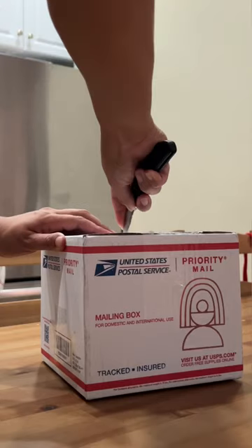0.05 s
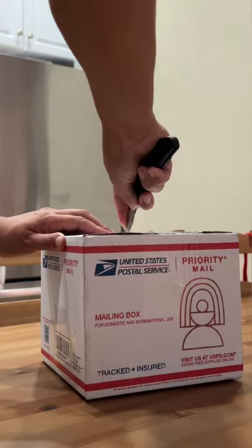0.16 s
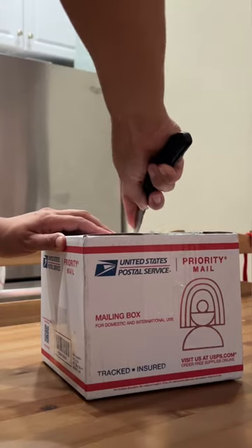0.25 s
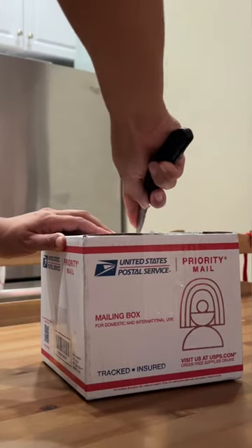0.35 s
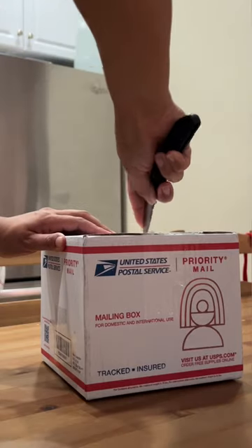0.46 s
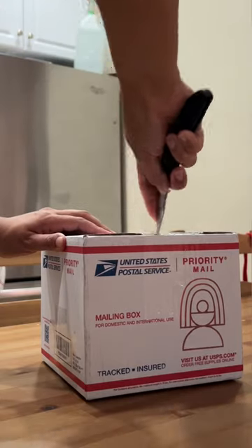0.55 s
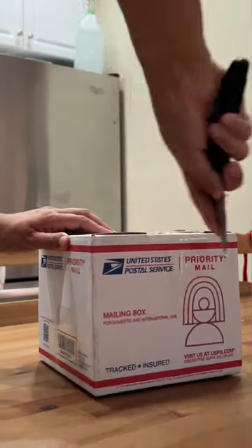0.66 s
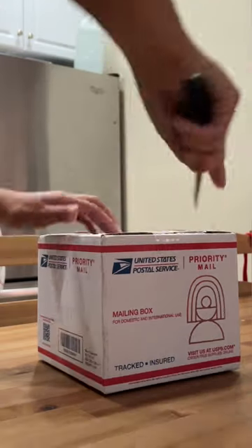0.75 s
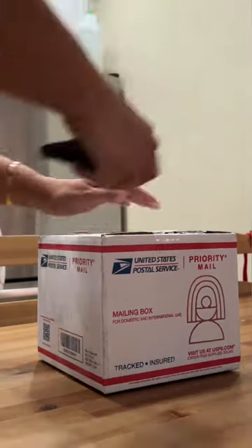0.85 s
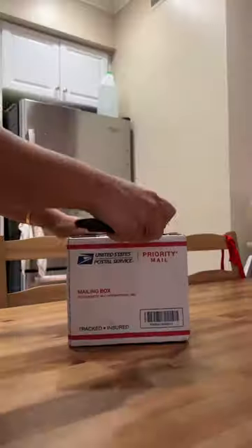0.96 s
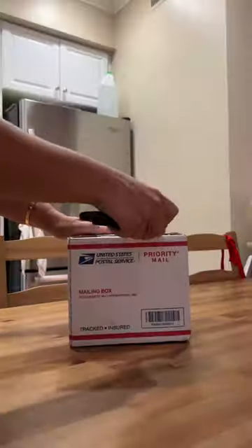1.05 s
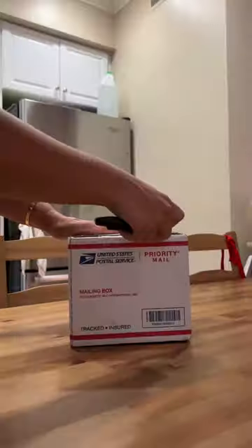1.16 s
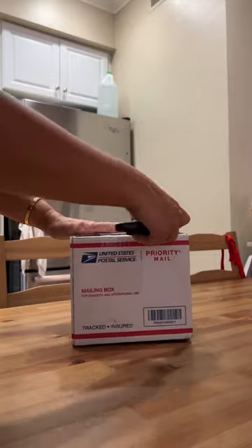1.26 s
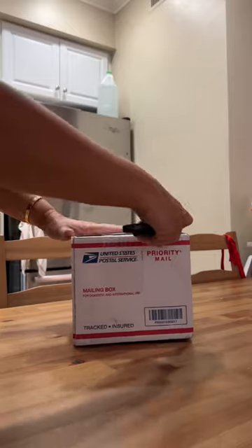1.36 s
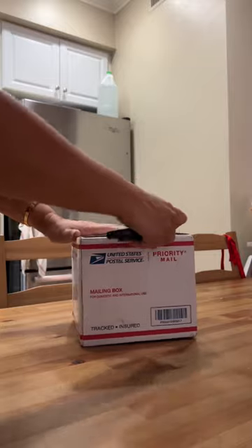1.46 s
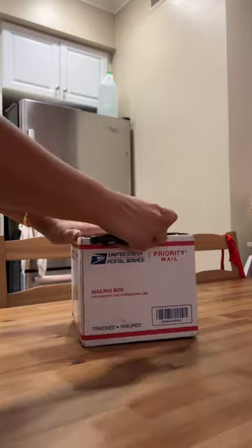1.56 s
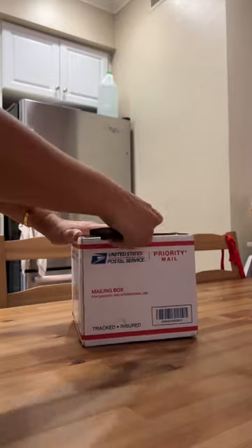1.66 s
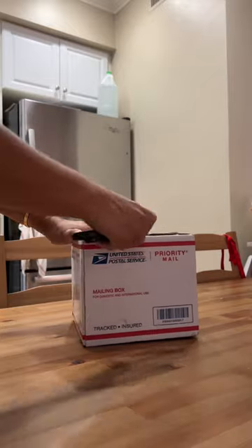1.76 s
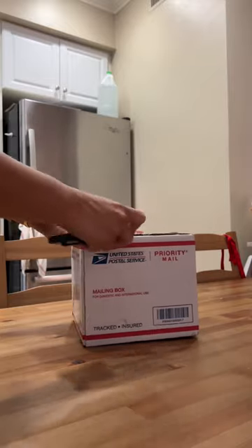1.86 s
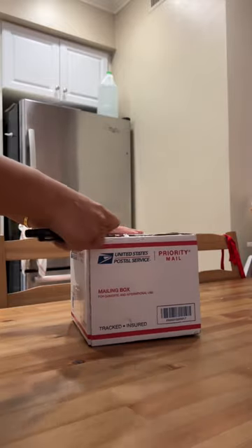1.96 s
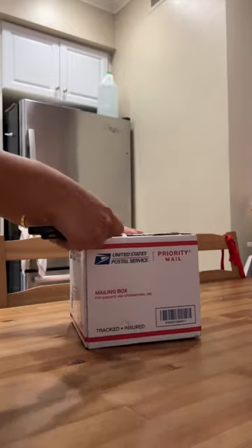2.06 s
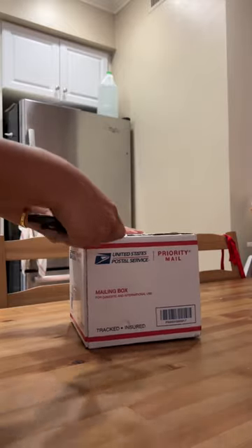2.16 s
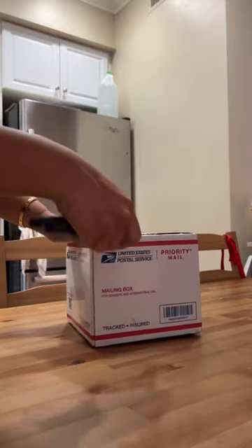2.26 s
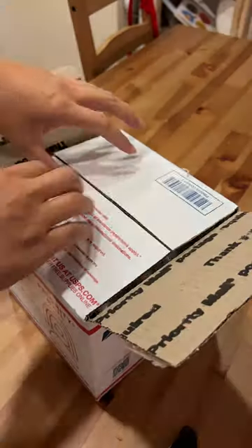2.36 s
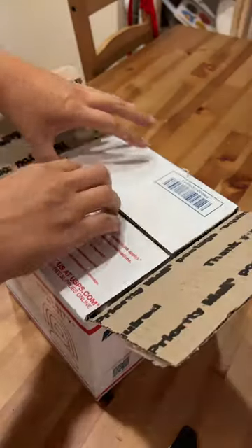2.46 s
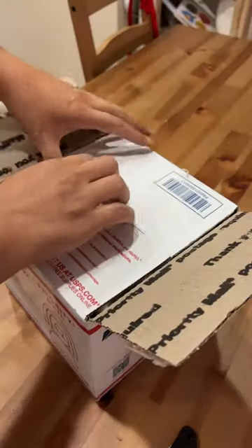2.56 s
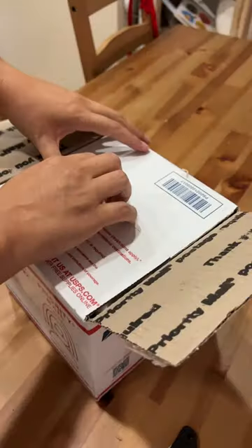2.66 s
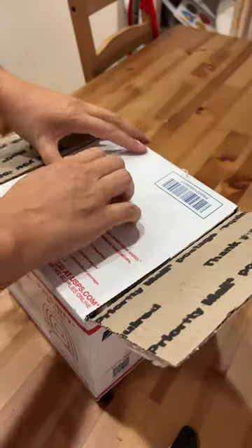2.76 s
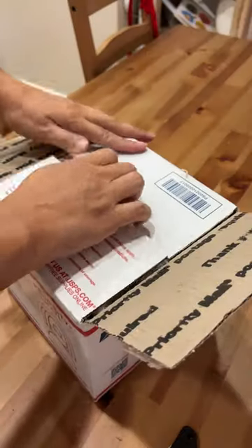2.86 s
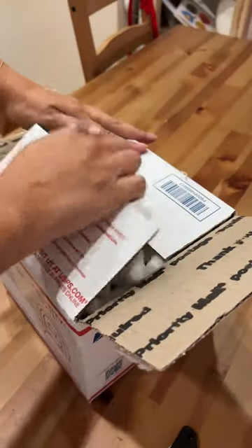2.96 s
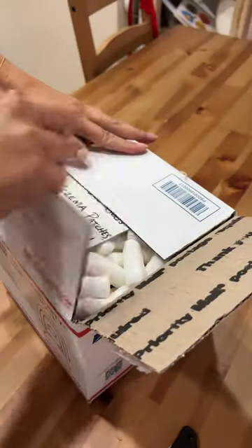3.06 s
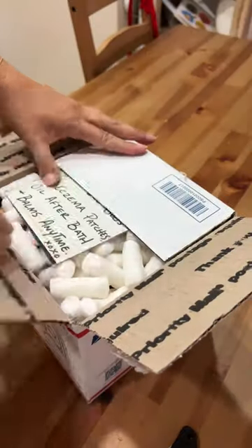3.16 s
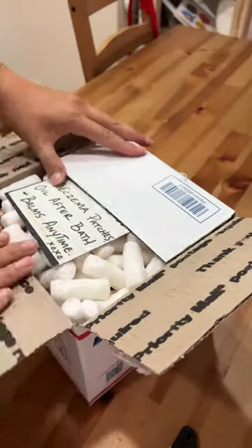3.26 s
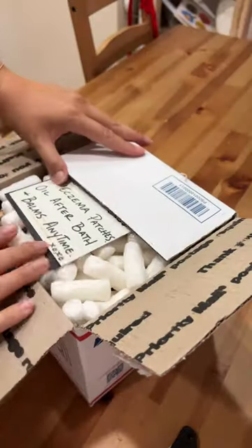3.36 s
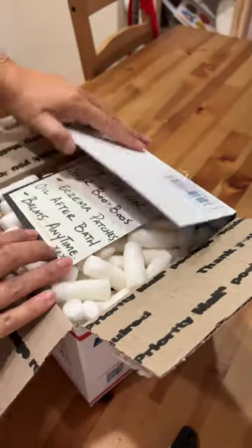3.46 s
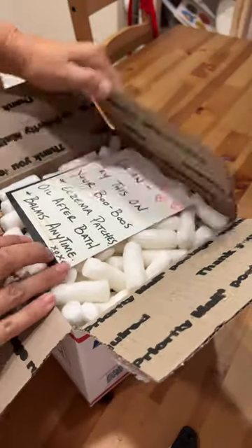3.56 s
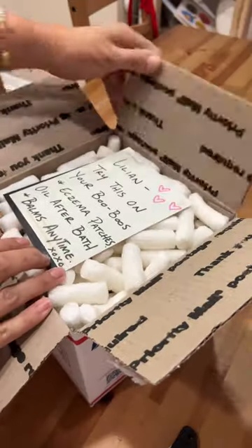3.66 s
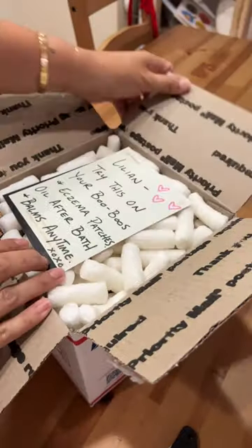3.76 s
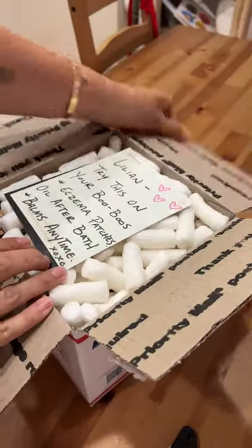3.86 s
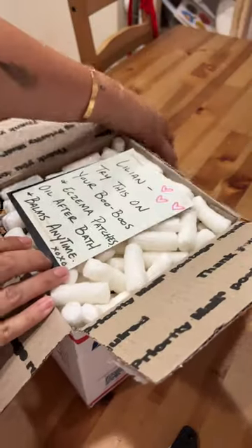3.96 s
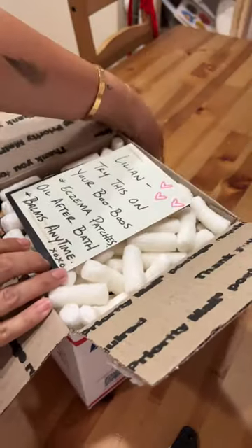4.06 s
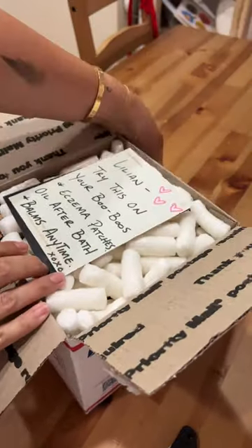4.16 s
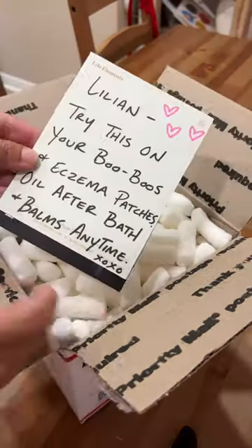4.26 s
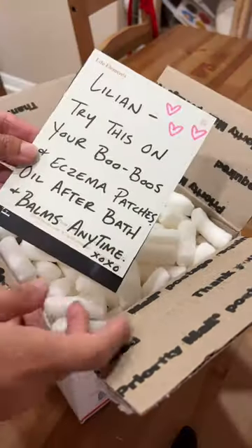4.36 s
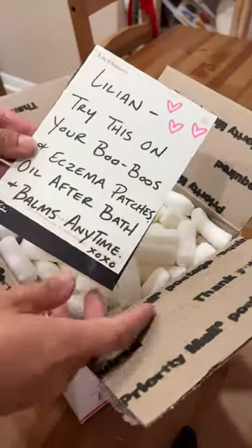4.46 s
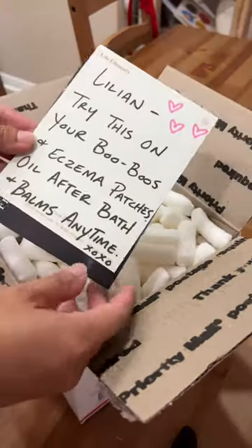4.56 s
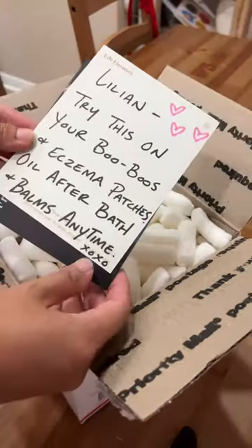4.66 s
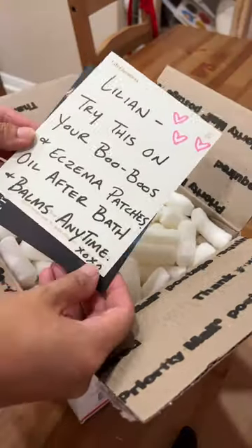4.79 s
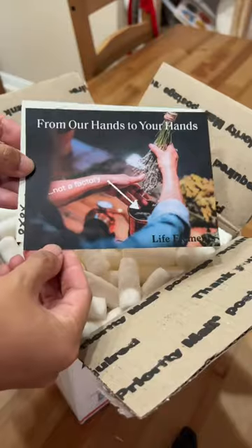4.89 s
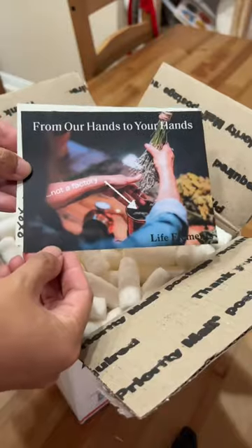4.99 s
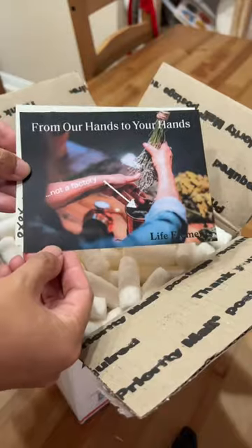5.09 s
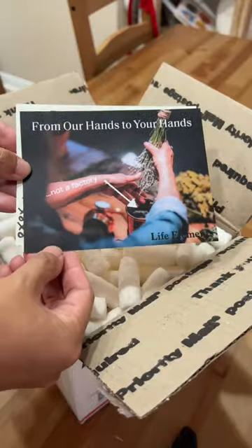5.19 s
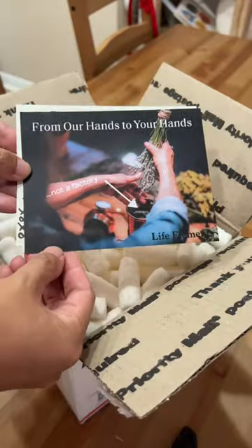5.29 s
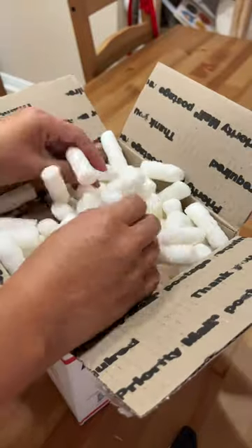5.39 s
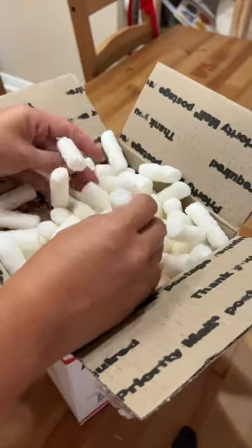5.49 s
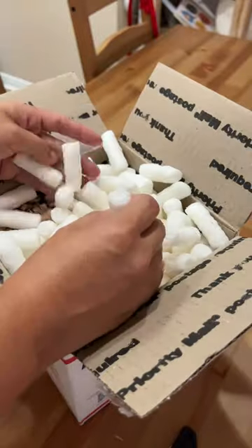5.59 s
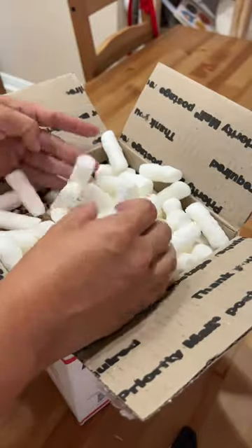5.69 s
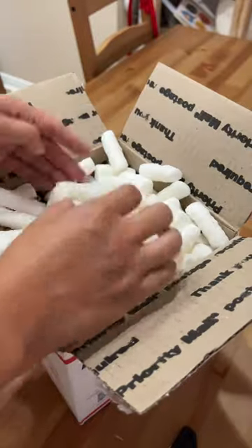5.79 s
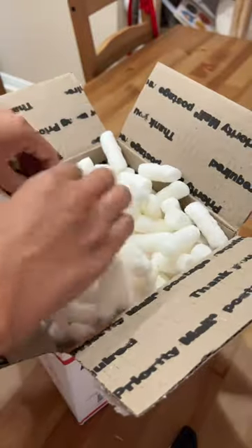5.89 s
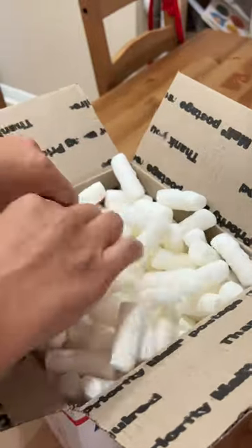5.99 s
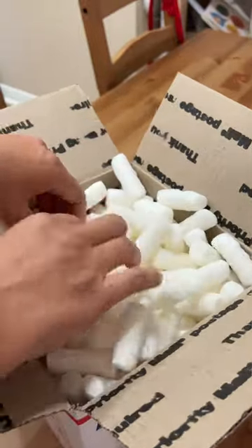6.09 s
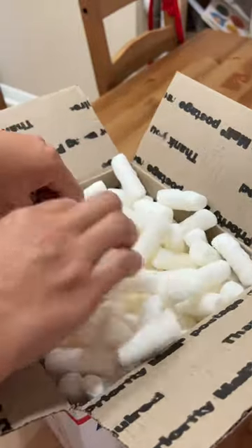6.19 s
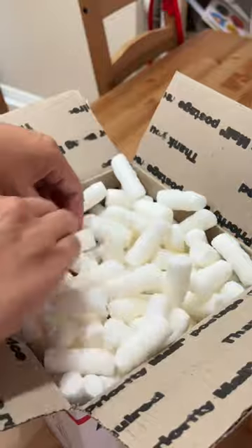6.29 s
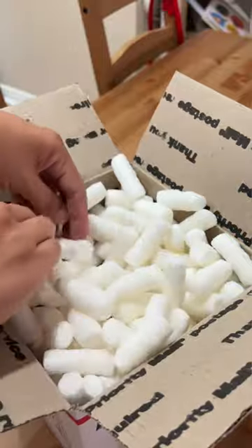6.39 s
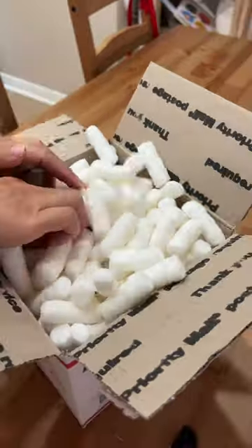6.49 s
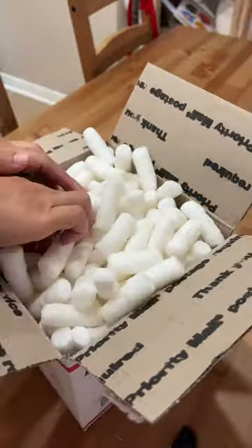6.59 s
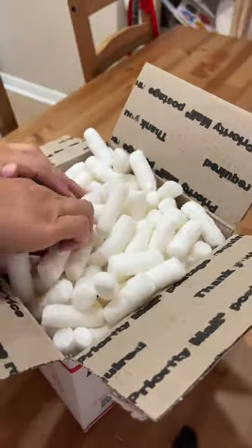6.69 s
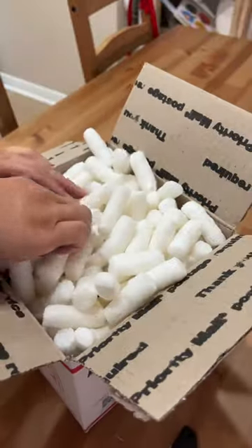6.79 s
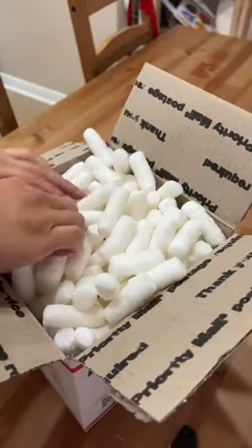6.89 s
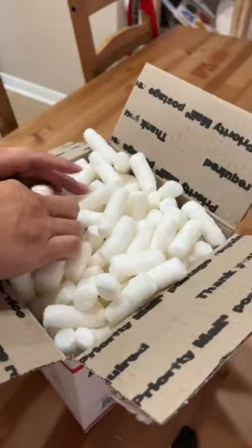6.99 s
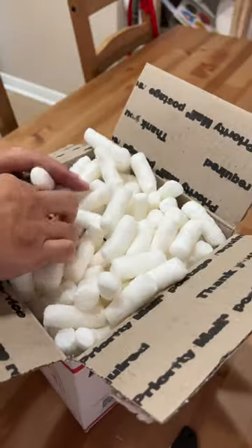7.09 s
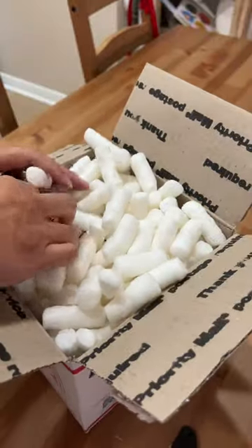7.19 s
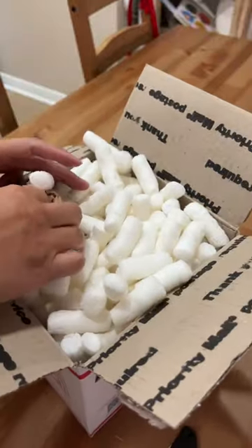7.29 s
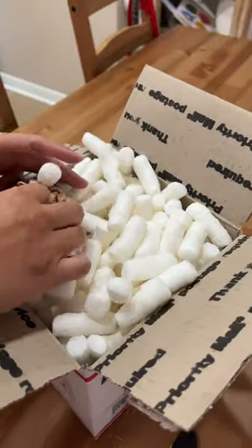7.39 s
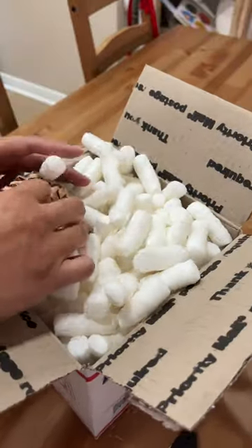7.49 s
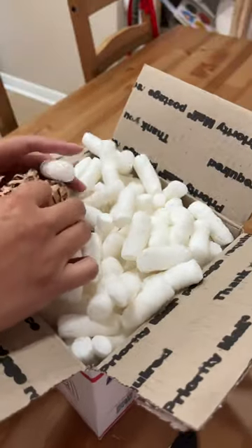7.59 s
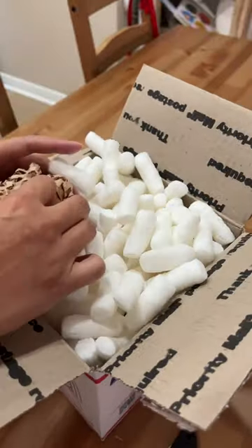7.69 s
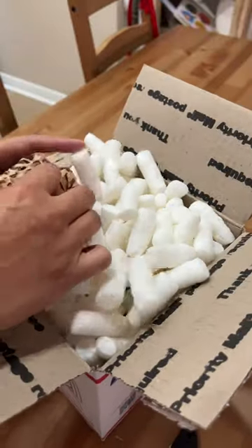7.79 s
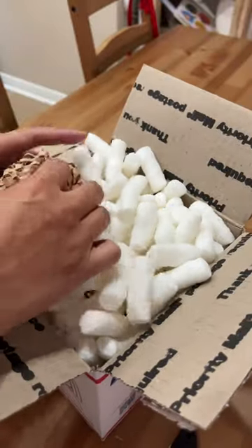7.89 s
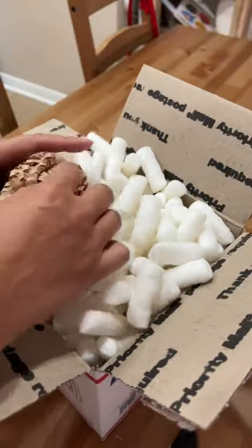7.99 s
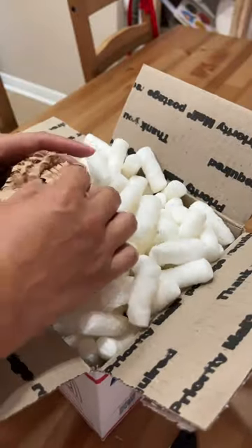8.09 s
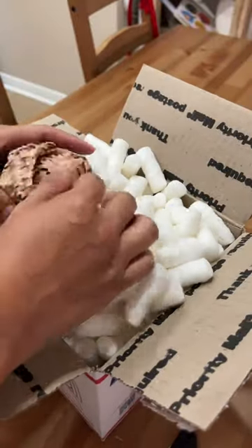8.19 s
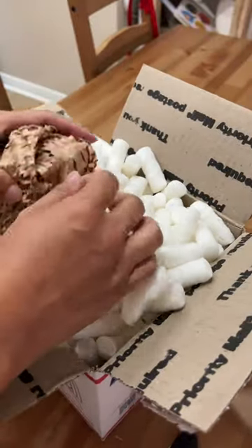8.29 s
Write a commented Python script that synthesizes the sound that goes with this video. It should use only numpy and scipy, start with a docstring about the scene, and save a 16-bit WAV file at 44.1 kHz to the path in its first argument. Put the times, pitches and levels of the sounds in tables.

```python
"""A cardboard box is slit by a knife, its flaps are pulled open and a card is slid out; hands then dig in foam peanuts.
Rubbing is stick-slip: clumps of tiny clicks, split into boom, rasp and fizz, and shaped by each movement.
Knocks, taps, tape and foam squeaks are decaying modes; crackles and catches are short bursts of noise;
the blade's glide and the drawn card are noise through resonances.
Rubs and knocks ring in the box; a fridge hums over low room noise, and sparse reflections make the small kitchen."""
import sys
import numpy as np
from scipy import signal
from scipy.fft import rfft, irfft, next_fast_len
from scipy.io import wavfile
from scipy.ndimage import uniform_filter1d

SR = 44100
rng = np.random.default_rng(int(sys.argv[2]) if len(sys.argv) > 2 else 0)


def file_out(sig):
    """Save sig as 16-bit WAV at sys.argv[1]."""
    # one column per channel
    cols = np.atleast_2d(sig).T
    # limit, then scale
    lim = np.clip(cols, -1, 1)
    pcm = np.round(lim * 32767).astype(np.int16)
    wavfile.write(sys.argv[1], SR, pcm)


N = 367794
TIME = np.arange(N) / SR
SIZE = next_fast_len(N + SR)  # padded, so that filter tails do not wrap round
FREQS = np.fft.rfftfreq(SIZE, 1 / SR)

# pushes of the blade through the seam: start_s, length_s, rasp_db, boom_over_rasp_db
CUTS = [(0.0, 0.011, -38, 11), (0.14, 0.14, -43.5, 12.5), (0.336, 0.25, -45.5, 9), (0.416, 0.062, -34.5, 7),
        (0.52, 0.1, -37.5, 10), (0.627, 0.071, -47, 14), (0.74, 0.047, -55.5, 11), (1.586, 0.049, -35, 4.5),
        (1.86, 0.077, -40.5, 5)]
CUT_ATTACK_S, CUT_RELEASE_S, CUT_FIZZ_OVER_RASP_DB = 0.024, 0.11, -4
# the blade stutters over the flutes of the corrugated board; each rip fades by the decay until the next
FLUTES_PER_S, FLUTE_JITTER, FLUTE_DECAY_DB = 32, 0.25, 10
# knocks on the box walls and flaps, and taps of foam pieces:
# start_s, thump_db, thump_pitch_hz, clack_db, clack_pitch_hz
KNOCKS = [(0.016, -20, 474, -19.5, 725), (0.164, -18.5, 233, -20.5, 680), (0.221, -22, 458, -21, 580),
          (0.251, -18.5, 417, -23, 1180), (0.41, -25, 400, -27.5, 1280), (0.531, -22, 206, -23, 700),
          (0.546, -31, 397, -23, 1400), (0.576, -25, 397, -21, 1920), (0.607, -13.5, 158, -31, 1280),
          (1.2, -28, 240, -27.5, 1170), (1.597, -23.5, 220, -14.5, 1160), (1.627, -33, 175, -30, 900),
          (1.656, -22, 203, -21, 2360), (2.3872, -30.5, 123, -27.5, 1804), (2.462, -22.5, 435, -40.5, 1120),
          (2.472, -31, 134, -32, 600), (2.56, -32, 110, -47, 1000), (2.59, -37, 105, -37, 1200),
          (2.797, -34.5, 213, -46, 900), (3.051, -25, 238, -23.5, 1000), (3.7193, -25, 220, -23.5, 1420),
          (3.9181, -28.5, 243, -24.5, 810), (4.0924, -33, 436, -37, 1250), (5.909, -35, 206, -32, 940),
          (5.944, -33, 260, -41, 700), (6.075, -40, 150, -42, 900), (6.528, -24, 124, -23, 610),
          (6.579, -29, 470, -28, 640), (6.604, -30, 160, -31, 1990), (6.682, -27.5, 430, -26, 1190),
          (6.813, -26, 290, -16.5, 583), (6.863, -20, 362, -18, 1360), (6.902, -27, 147, -27, 716),
          (7.751, -37, 300, -23.5, 1160), (7.774, -36, 570, -25, 1200), (7.856, -47, 400, -26.5, 870),
          (8.004, -32.5, 486, -42, 890), (8.111, -42, 300, -25.5, 1720)]
TICK_OVER_CLACK_DB = -4.5
# short catches of the blade, a flap edge or a foam piece: start_s, level_db, time_to_crest_s, edge_pitch_hz
CATCHES = [(0.223, -36.5, 0.0072, 2120), (0.362, -40, .003, 1290), (0.445, -32.5, 0.0062, 1230),
           (0.462, -29, 0.0071, 890), (0.486, -32.5, 0.011, 1150), (0.585, -32, 0.0082, 1950),
           (0.607, -24, 0.0028, 1430), (1.202, -41.5, 0.0046, 1230), (1.851, -45, .007, 1290),
           (1.893, -45, 0.0052, 900), (1.951, -37, 0.0019, 800), (2.181, -43, 0.0018, 1790),
           (2.858, -47.5, 0.0027, 2380), (2.908, -32.5, 0.0045, 1870), (2.912, -29, 0.004, 1210),
           (3.1925, -28, 0.0027, 670), (3.203, -37, 0.0084, 1850), (3.551, -37, 0.0028, 2200),
           (3.571, -37, 0.0026, 1670), (5.861, -41.5, .002, 1500), (5.959, -37.5, .002, 2200),
           (6.132, -44.5, 0.0036, 694), (6.215, -40, 0.0035, 650), (6.392, -44, 0.0067, 1940),
           (6.502, -38, 0.0021, 2660), (6.655, -36, 0.011, 4060), (7.081, -34, 0.0041, 860),
           (7.106, -30, .007, 760), (7.325, -37, .003, 1900), (7.576, -38, .0025, 1000),
           (8.02, -42, 0.0026, 2870), (8.029, -37, 0.0022, 1950), (8.212, -42, 0.0027, 1100)]
# crackles of tape, flaps, foam pieces and paper wrapping: start_s, level_db, decay_s
CRINKLES = [(0.608, -18.5, 0.0032), (1.261, -45, .002), (1.441, -37.5, 0.0016), (1.5098, -34.5, 0.0016),
            (1.638, -18, 0.0013), (2.1829, -47, 0.0013), (2.2697, -45, 0.0024), (3.552, -25, .002),
            (5.429, -33, .0007), (5.532, -25.5, 0.00086), (5.5965, -29, 0.0013), (5.863, -34.5, 0.0024),
            (5.957, -34, .002), (6.226, -31.5, 0.0025), (6.242, -32.5, 0.0022), (6.5781, -25, 0.0022),
            (6.6103, -22, .002), (6.779, -23.5, 0.0025), (6.8146, -18.5, .0015), (7.2369, -24, 0.00099),
            (7.7175, -23, 0.0023), (7.776, -21, .0006), (8.124, -27, 0.0009), (8.1352, -30, .002),
            (8.156, -22, 0.0018), (8.28, -26.5, .002), (8.295, -32, .002)]
# blade gliding along the groove of the seam, lightly at first: start_s, rise_s, length_s, release_s, level_db
GLIDES = [(0.926, 0.016, 0.095, .05, -63.5), (0.99, 0.047, .18, .07, -51.5)]
# resonances of the groove: pitch_hz, width_hz, level_db
GROOVE = [(835, 180, -1), (1160, 260, 4), (1384, 200, -10), (2290, 560, -5)]
# hands, flaps and card sliding over cardboard, cresting as the rise ends:
# start_s, rise_s, release_s, rasp_db, boom_db, fizz_db
SLIDES = [(1.05, 0.024, 0.12, -54, -42, -68), (1.075, 0.11, 0.092, -49, -41, -48),
          (1.226, 0.035, 0.2, -57.5, -47, -63), (1.393, .11, 0.1, -47.5, -48, -52.5),
          (1.653, .041, 1, -51, -46.5, -52.5), (1.913, 0.24, 0.047, -55, -46, -46.5),
          (2.386, 0.011, 0.05, -48.5, -40.5, -44), (2.459, 0.0051, 0.083, -44, -32.5, -47),
          (2.52, 0.03, 0.14, -41.5, -33.5, -45), (2.715, 0.055, 0.13, -44.5, -44, -50.5),
          (2.88, 0.028, 0.056, -44, -33.5, -45), (2.982, 0.024, 0.29, -50.5, -51, -51.5),
          (3.125, 0.07, 0.12, -40, -35, -39), (3.258, 0.11, 0.2, -48.5, -39, -46.5),
          (3.455, 0.12, 0.049, -42, -38.5, -40), (3.599, 0.04, 0.72, -54.5, -46, -54.5),
          (3.895, .017, 0.31, -53, -53.5, -69), (4.088, 0.013, 0.23, -54, -48, -73.5),
          (4.2, 0.082, 0.073, -52, -45.5, -41), (4.309, 0.1, 0.21, -51.5, -45, -45),
          (4.908, 0.058, 0.11, -58.5, -63, -70.5), (5.167, .027, .11, -72.5, -60.5, -71.5)]
# tape snapping under the blade, and its echo off the lid: start_s, relative_level_db
SNAPS = [(1.6535, 0), (1.6544, -6)]
SNAP_DB = -8.5
# ringing of the taut tape: pitch_hz, width_hz, level_db
TAPE = [(1280, 490, -17), (2270, 500, -21.5), (3100, 320, -9.5), (4500, 540, -1.5), (5400, 1200, 2.5),
        (8000, 2900, -11), (10700, 1300, 3)]
# card drawn over the edge of the box
CARD_START_S, CARD_RISE_S, CARD_LENGTH_S, CARD_RELEASE_S = 4.2, 0.012, 0.063, 0.025
CARD_DB = -42.5
# resonances of the card: pitch_hz, width_hz, level_db
CARD = [(760, 110, 16), (1020, 52, 12), (2370, 680, 0.5), (3730, 190, -5), (5500, 450, -17)]
# scoops of the hands through the foam: start_s, length_s, rasp_db, boom_db, fizz_db
SCOOPS = [(5.354, 0.12, -57.5, -51, -48.5), (5.487, 0.14, -58, -58.5, -49), (5.651, 0.13, -61, -51, -55),
          (5.826, 0.16, -53, -48, -50), (5.967, 0.16, -53, -54.5, -51), (6.086, 0.22, -59, -52.5, -54),
          (6.184, 0.024, -47, -42.5, -57), (6.339, 0.093, -50, -47.5, -46), (6.444, 0.075, -47, -41.5, -40),
          (6.51, 0.38, -44, -47.5, -43), (6.925, 0.21, -38.5, -42, -41.5), (7.039, 0.1, -37.5, -45, -43.5),
          (7.198, 0.27, -44.5, -48, -45.5), (7.346, 0.18, -41, -46.5, -47.5),
          (7.559, 0.26, -41.5, -44.5, -46), (7.694, 0.2, -45, -46, -47), (7.838, 0.14, -54, -47.5, -52),
          (7.974, 0.055, -47, -45.5, -45), (8.067, 0.12, -48, -44.5, -42), (8.168, 0.2, -52, -50.5, -50)]
SCOOP_ATTACK_S, SCOOP_RELEASE_S = 0.025, 0.079
# squeaks of single foam pieces; the level is relative to the scuffing
SQUEAK_LOW_HZ, SQUEAK_HIGH_HZ, SQUEAK_DECAY_CYCLES = 650, 8000, 2.5
SQUEAKS_PER_S, SQUEAK_DB = 700, -9.5
# spectral colour of rubbed cardboard: frequency_hz, density_db (per Hz)
CARDBOARD_COLOUR = [(40, -27), (70, -7.5), (105, -2), (210, 5), (400, -4.5), (540, -7.5), (750, -13),
                    (1300, -15.5), (2300, -19.5), (3400, -26.5), (4400, -24.5), (9000, -22.5), (11400, -22),
                    (16000, -31.5)]
# spectral colour of rubbed foam: frequency_hz, density_db (per Hz)
FOAM_COLOUR = [(29, -17), (50, -6.5), (128, 3), (252, 7.5), (291, -1), (428, 3), (520, -6), (630, -6),
               (729, -11.5), (1910, -9.5), (3180, -16.5), (6390, -11.5), (9870, -13), (11100, -10),
               (16000, -19.5)]
# ringing of the box: pitch_hz, level_db, t60_s
BOX = [(120, 2, 0.043), (154, -20, 0.29), (212.6, 1.5, 0.4), (297.6, 1.5, 0.27), (408, 2, 0.38),
       (461, 6, 0.24), (800, 0, .12)]
# spectral colour of the room noise: frequency_hz, density_db (per Hz)
ROOM_NOISE = [(15, -39), (25, 9), (59, 4.5), (127, 1.5), (344, -13), (394, -14), (516, -22.5), (624, -22),
              (911, -35), (6050, -45), (16000, -67.5)]
ROOM_NOISE_DB = -55
# hum of the fridge: pitch_hz, level_db
HUM = [(118.4, -60.5), (210, -66.5)]
# reverberation of the kitchen: frequency_hz, t60_s
KITCHEN = [(150, 0.47), (500, 0.19), (2000, 0.66), (6000, 0.6), (14000, 0.23)]
# difference of the reflections between the ports: frequency_hz, side_over_mid_db
KITCHEN_WIDTH = [(120, -10), (250, -17.5), (400, 6), (750, 9.5), (1300, -2.5), (1750, -15.5), (2100, -11.5),
                 (2450, 0.5), (3250, 3.5), (3650, -6), (4250, -6.5), (5200, 2), (8000, 2), (11000, -0.5),
                 (14000, 3.5)]
# moments at which the level dips briefly: centre_s, depth_db, half_width_s
DIPS = [(0.931, -13, .005), (2.334, -17, 0.0097), (2.362, -6.5, 0.019), (4.872, -10, 0.0047),
        (5.969, -11, 0.0046), (6.522, -11.5, 0.0046), (8.07, -12, 0.0051)]
# phase between the microphone ports: frequency_hz, left_lead_rad
PORT_PHASE = [(4700, 0), (5500, -.7), (6400, -1.2), (8100, -.7), (8800, -1.3), (12500, -1.35),
              (16000, -1.8)]
# balance of the microphone ports: frequency_hz, left_over_right_db
PORT_BALANCE = [(150, 0), (250, 2.3), (500, .3), (1000, 0)]
EDGE_HZ = 15950  # upper band limit


def gain_of(db):
    """Logarithmic level: decibels become an amplitude gain."""
    return 10 ** (np.asarray(db) / 20)


def evened(x):
    """Normalization: the signal is scaled to rms 1."""
    return x / np.sqrt(np.mean(x ** 2) + 1e-20)


def read(points, hz):
    """Interpolation: a table is read along a logarithmic frequency axis."""
    table_hz, value = np.transpose(points)
    return np.interp(np.log(hz + 1), np.log(table_hz + 1), value)


def filtered(x, response):
    """Linear filtering: the spectrum is multiplied by a frequency response."""
    return irfft(rfft(x, SIZE) * response, SIZE)[..., :N]


def below(hz, order=4):
    """Low-pass law: the share of the power that lies below a corner."""
    return 1 / (1 + (FREQS / hz) ** (2 * order))


def add(mix, s, sound):
    """Superposition: a sound is added into the mix at its time."""
    part = mix[max(round(s * SR), 0):][:len(sound)]
    part += sound[:len(part)]


def wander(hz):
    """Low-passed noise: a smooth random drift of rms 1, up to about the given rate."""
    return evened(filtered(rng.standard_normal(N), below(hz, order=1)))


def ring(t, hz, decay):
    """Free vibration: a struck mode is an exponentially decaying sine."""
    return np.sin(2 * np.pi * hz * t) * np.exp(-t / decay)


def mottled(x, depth_db, size):
    """Random spectral modulation: patches over time and frequency, longer and narrower for longer frames."""
    z = signal.stft(x, nperseg=size)[2]
    patches = uniform_filter1d(rng.standard_normal(z.shape), size=4, axis=0)
    patches = evened(uniform_filter1d(patches, size=4, axis=1))
    return signal.istft(z * gain_of(depth_db * patches), nperseg=size)[1][:N]


def grains(per_s, spread_db, clump_db, clump_hz, patchy_db):
    """Stick-slip friction: tiny clicks of uneven size come in clumps, with a patchy colour."""
    sizes = gain_of(spread_db * np.minimum(rng.exponential(1, N), 4))
    sizes = sizes * rng.choice([-1, 1], N)
    clicks = sizes * (rng.random(N) < per_s / SR)
    clicks = mottled(clicks, patchy_db, size=1024)
    clumps = gain_of(clump_db * np.clip(wander(clump_hz), -2, 2))
    return evened(clicks * clumps)


def stroke(start, rise, length, release):
    """Movement envelope: gains 20 dB per rise time, holds until its length is up, loses 20 dB per release time."""
    t = TIME - start
    gathering, slowing = np.clip([1 - t / rise, (t - length) / release], -10, 10)
    return 1 / np.sqrt(1 + 10 ** (2 * gathering) + 10 ** (2 * slowing))


def together(strokes):
    """Power addition: (envelope, boom_db, rasp_db, fizz_db) strokes sum into three gain curves."""
    powers = np.transpose([gain_of(row[1:]) ** 2 for row in strokes])
    envelopes = np.array([row[0] ** 2 for row in strokes])
    return np.sqrt(powers @ envelopes)


def box(x):
    """Modal resonance: the walls and the air between them ring, at unit energy."""
    t = TIME[:SR // 2]
    modes = sum(gain_of(db) * ring(t, hz, t60 / np.log(1000)) for hz, db, t60 in BOX)
    return signal.oaconvolve(x, modes / np.linalg.norm(modes))[:N]


def rubbing(strokes, colour, slips, ring_db):
    """Friction in three bands: the box booms low, the contact rasps in the middle, fizz lies on top."""
    boom, rasp, fizz = together(strokes)
    low, high = below(600), 1 - below(3500)
    shape = gain_of(read(colour, FREQS))
    walls = evened(filtered(slips, shape * np.sqrt(low)))
    walls = evened(walls + gain_of(ring_db) * evened(box(walls)))
    contact = evened(filtered(slips, shape * np.sqrt((1 - low) * (1 - high))))
    treble = evened(filtered(slips, shape * np.sqrt(high)))
    return walls * boom + contact * rasp + treble * fizz


def drag(resonances):
    """Forced vibration: friction noise excites the resonances of a dragged edge, at rms 1."""
    shape = sum(gain_of(db) / (1 + 2j * (FREQS - hz) / width) for hz, width, db in resonances)
    top_hz = 1.1 * max(hz for hz, width, db in resonances)
    return evened(filtered(rng.standard_normal(N), shape * np.sqrt(below(top_hz, order=8))))


def background():
    """Stationary noise and tones: low room noise with the slightly wavering hum of the fridge."""
    air = evened(filtered(rng.standard_normal(N), gain_of(read(ROOM_NOISE, FREQS))))
    hum = np.zeros(N)
    for hz, db in HUM:
        phase = 2 * np.pi * hz * TIME + wander(2.1)
        hum += gain_of(db) * np.sqrt(2) * np.sin(phase)  # level is rms
    return gain_of(ROOM_NOISE_DB) * air + hum


def knife():
    """Periodic tearing: the blade saws along the seam in short pushes, ripping flute after flute."""
    flutes = np.cumsum(FLUTES_PER_S * (1 + FLUTE_JITTER * wander(22))) / SR
    slips = grains(per_s=6000, spread_db=3.0, clump_db=0.5, clump_hz=130, patchy_db=3.5)
    rips = evened(slips * gain_of(-FLUTE_DECAY_DB * (flutes % 1)))
    pushes = [(stroke(s, CUT_ATTACK_S, length, CUT_RELEASE_S), db + boom_db, db, db + CUT_FIZZ_OVER_RASP_DB)
              for s, length, db, boom_db in CUTS]
    return rubbing(pushes, CARDBOARD_COLOUR, rips, ring_db=-4.0)


def knocks():
    """Impact: each knock or tap gives a tick at the contact, a short clack and a damped thump."""
    t, out = TIME[:SR // 8], np.zeros(N)
    for s, thump_db, thump_hz, clack_db, clack_hz in KNOCKS:
        # the thump dies within a few cycles, its overtone sooner
        thump = ring(t, thump_hz, 1.77 / thump_hz) + 0.5 * ring(t, 1.9 * thump_hz, 0.45 / thump_hz)
        clack = ring(t, clack_hz, 0.0011) + 0.3 * ring(t, 2.5 * clack_hz, 0.0008)
        tick = rng.standard_normal(len(t)) * np.exp(-t / 0.0026) * (1 - np.exp(-t / 0.0014))
        contact = clack + gain_of(TICK_OVER_CLACK_DB) * tick
        add(out, s, gain_of(thump_db) * thump + gain_of(clack_db) * contact)
    return out + gain_of(-26.5) * box(out)


def catches():
    """Sudden release: a caught edge lets go with a short dry rasp that makes it ring."""
    t, out = TIME[:SR // 8], np.zeros(N)
    for s, db, crest, hz in CATCHES:
        fibres = rng.standard_normal(len(t))
        edge = evened(signal.lfilter(*signal.iirpeak(hz, 3.5, fs=SR), fibres))
        swell = t / crest * np.exp(1 - t / crest)
        add(out, s, gain_of(db) * swell * (0.58 * edge + 0.47 * fibres))
    return out


def crinkles():
    """Crackling: each flick is a tight, exponentially decaying burst of noise."""
    t, out = TIME[:SR // 30], np.zeros(N)
    for s, db, decay in CRINKLES:
        add(out, s, gain_of(db) * rng.standard_normal(len(t)) * np.exp(-t / decay))
    return filtered(out, (1 - below(980, order=1)) * np.sqrt(below(9300, order=1)))


def glide():
    """Resonant friction: the blade runs lightly along the seam without cutting."""
    envelope = sum(gain_of(db) * stroke(*timing) for *timing, db in GLIDES)
    return envelope * drag(GROOVE)


def cardboard():
    """Sliding friction: hands, flaps and card rub; each slide swells to a crest and dies away."""
    slips = grains(per_s=14000, spread_db=3.5, clump_db=1.5, clump_hz=130, patchy_db=3.5)
    slides = [(stroke(s, rise, rise, release), boom_db, rasp_db, fizz_db)
              for s, rise, release, rasp_db, boom_db, fizz_db in SLIDES]
    return rubbing(slides, CARDBOARD_COLOUR, slips, ring_db=-4.5)


def snap():
    """Release of tension: taut tape parts and rings for about a millisecond; a bare click feeds the room."""
    t, out, click = TIME[:SR // 50], np.zeros(N), np.zeros(N)
    crack = sum(gain_of(db) * ring(t, hz, 1 / (np.pi * width)) for hz, width, db in TAPE)
    for s, db in SNAPS:
        add(out, s, gain_of(SNAP_DB + db) * crack)
    add(click, SNAPS[0][0], np.ones(1))
    return out, filtered(click, np.sqrt(below(6000, order=1)))


def card():
    """Resonant friction: the card sounds in its own modes as it is drawn over the edge of the box."""
    envelope = stroke(CARD_START_S, CARD_RISE_S, CARD_LENGTH_S, CARD_RELEASE_S)
    return gain_of(CARD_DB) * envelope * drag(CARD)


def squeaks():
    """Brief vibration: each slipping foam piece chirps for a few cycles at one of 24 pitches."""
    t, out = TIME[:SR // 40], np.zeros(N)
    pitches = np.geomspace(SQUEAK_LOW_HZ, SQUEAK_HIGH_HZ, num=24)
    for place, pick, size in rng.random((round(SQUEAKS_PER_S * N / SR), 3)):
        hz = pitches[int(pick * len(pitches))]
        chirp = ring(t, hz, SQUEAK_DECAY_CYCLES / hz)
        add(out, place * N / SR, np.sqrt(hz) * size ** 2 * chirp)
    return evened(out)


def peanuts():
    """Granular friction: many light foam pieces scuff and squeak, with a sparse crackle of larger clicks that
    rises and falls with the scoops."""
    scuffs = grains(per_s=7500, spread_db=3.0, clump_db=0.5, clump_hz=143, patchy_db=1.5)
    scuffs = mottled(scuffs, 1.0, size=256)
    crackle = grains(per_s=200, spread_db=1.0, clump_db=-3.0, clump_hz=23, patchy_db=3)
    slips = evened(scuffs + gain_of(-9.0) * crackle + gain_of(SQUEAK_DB) * squeaks())
    scoops = [(stroke(s, SCOOP_ATTACK_S, length, SCOOP_RELEASE_S), boom_db, rasp_db, fizz_db)
              for s, length, rasp_db, boom_db, fizz_db in SCOOPS]
    return rubbing(scoops, FOAM_COLOUR, slips, ring_db=-27)


def kitchen(x):
    """Reverberation: sparse reflections, different at each port, each band decaying at its own speed."""
    count = SR // 2
    taps = rng.standard_normal((2, count)) * (rng.random((2, count)) < 3000 / SR)
    taps = taps * (TIME[:count] > 0.005)
    hz, t, z = signal.stft(taps, SR, nperseg=256)
    decay = gain_of(-60 * t / read(KITCHEN, hz)[:, None])
    tail = signal.istft(z * decay, SR, nperseg=256)[1]
    mid, side = signal.fftconvolve(x[None], tail / np.linalg.norm(tail[0]), axes=1)[:, :N]
    # the side signal enters the two ports with opposite signs
    return mid + np.array([[1], [-1]]) * filtered(side, gain_of(read(KITCHEN_WIDTH, FREQS)))


def dips():
    """Amplitude modulation: the level dips briefly, along a bell curve in decibels."""
    return gain_of(sum(db * np.exp(-((TIME - s) / width) ** 2) for s, db, width in DIPS))


def scene():
    """Superposition: all the handling, close by, with the room behind it."""
    rubs = knife() + cardboard() + peanuts() + catches() + crinkles() + glide() + card()
    impacts = knocks()
    crack, click = snap()
    room = kitchen(gain_of(-14.0) * rubs + gain_of(-14.5) * impacts + gain_of(-2.5) * click)
    return dips() * (rubs + impacts + crack + room + background())


def record(dry):
    """Dispersion and band limits: two ports of unequal phase and level; low frequencies lag."""
    lag_cycles = 1.8  # well above 30 Hz the delay is about this many cycles, less a constant
    smear = np.exp(-2j * np.pi * lag_cycles * (np.log(1 + FREQS / 30) - FREQS / (SR / 2)))
    sides = np.array([[0.5], [-0.5]])
    ports = np.exp(1j * sides * read(PORT_PHASE, FREQS)) * gain_of(sides * read(PORT_BALANCE, FREQS))
    sound = filtered(dry, smear * ports * (1 - below(48, order=2)))
    low_pass = signal.firwin(511, EDGE_HZ, window=("kaiser", 9), fs=SR)
    return signal.oaconvolve(sound, low_pass[None], "same")


dry = scene()
out = record(dry)
file_out(out)
```